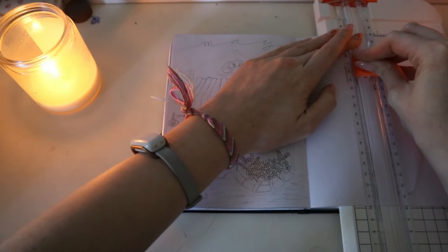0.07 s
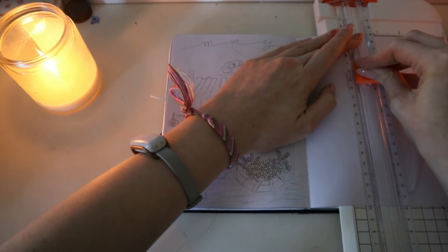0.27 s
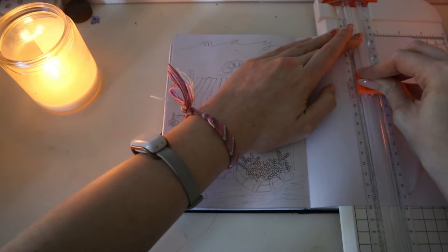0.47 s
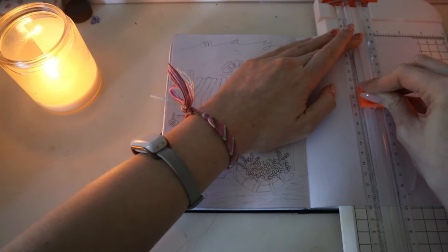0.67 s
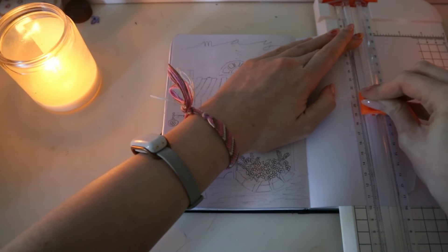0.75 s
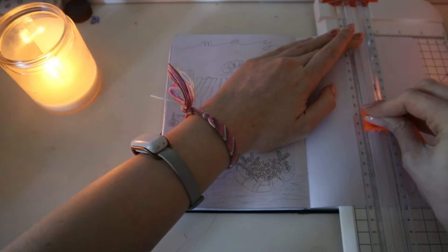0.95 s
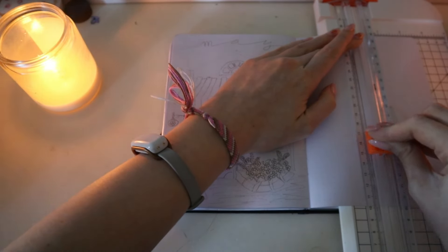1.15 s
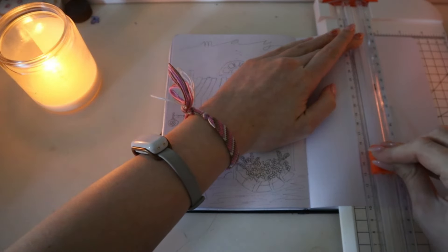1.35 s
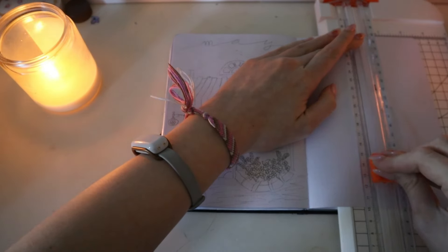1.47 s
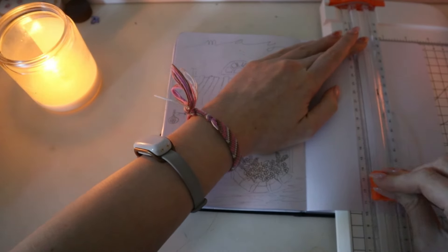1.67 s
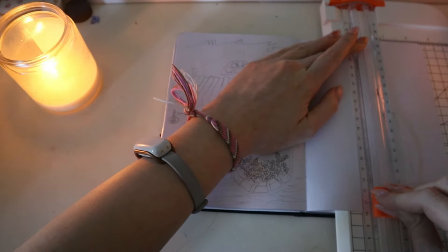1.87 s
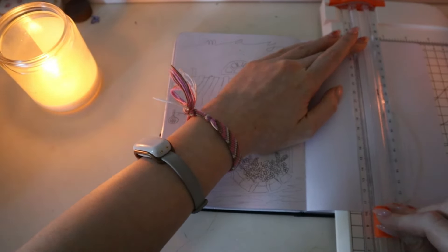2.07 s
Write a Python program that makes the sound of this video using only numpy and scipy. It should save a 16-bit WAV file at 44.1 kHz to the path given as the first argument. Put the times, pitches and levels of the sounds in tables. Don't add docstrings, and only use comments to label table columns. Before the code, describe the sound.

A paper trimmer blade runs along its rail, close up in a quiet room. From the start to about 2.05 s it hisses and rasps through paper, with hollow plastic chatter strongest until 1.2 s. Loud, climbing stick-slip squeaks come at 0.55-0.78 s, a small knock at 0.8 s, sharp clicks near 1.57 s and lighter ones to 1.8 s. Then it stops, leaving faint air and fan hum.

```python
import sys
import numpy as np
from scipy import signal
from scipy.fft import rfft, irfft
from scipy.io import wavfile

SR = 44100
rng = np.random.default_rng(int(sys.argv[2]) if len(sys.argv) > 2 else 0)


def generate_wav(signal):
    frames = np.transpose(np.atleast_2d(signal))
    scaled = np.clip(frames, -1, 1) * 32767
    pcm = np.round(scaled).astype(np.int16)
    wavfile.write(sys.argv[1], SR, pcm)


def rack_gain(trim_db):
    fader = np.asarray(trim_db, float)
    return 10 ** (fader / 20)


N = 92610
TIME = np.arange(N) / SR
HZ = np.maximum(np.arange(N // 2 + 1) * SR / N, 1)


def rms_one(x):
    return x / np.sqrt(np.mean(x ** 2) + 1e-20)


def at_hz(points):
    hz, value = np.transpose(points)
    return np.interp(np.log(HZ), np.log(hz), value)


def at_time(points):
    return np.interp(TIME, *np.transpose(points))


def drift(rate_hz):
    r = np.exp(-2 * np.pi * rate_hz / SR)
    noise = rng.standard_normal(N + SR)
    return rms_one(signal.lfilter([1], [1, -2 * r, r * r], noise)[SR:])


def resonate(x, peaks, widen=1):
    out = 0
    for k, (hz, width, db) in enumerate(peaks):
        r = np.exp(-np.pi * width * widen / SR)
        b = (1 - r * r) / 2 * rack_gain(db) * (-1) ** k
        out = out + signal.lfilter([b, 0, -b], [1, -2 * r * np.cos(2 * np.pi * hz / SR), r * r], x)
    return out


def grains(per_s, spread_db):
    sizes = rack_gain(spread_db * np.minimum(rng.exponential(1, (2, N)), 4))
    sizes = sizes * rng.choice([-1, 1], (2, N))
    return sizes * (rng.random((2, N)) < per_s / SR) + 1e-18


def scatter(db):
    t60_s = 0.081
    cloud = rng.standard_normal(N) * rack_gain(np.maximum(-60 * TIME / t60_s, -200))
    return (1 + rack_gain(db) * rfft(rms_one(cloud)) / np.sqrt(N)) / np.sqrt(1 + rack_gain(2 * db))


def pair(x, alike):
    mid, side = rfft(x)
    c = np.clip(at_hz(alike), 0, 1)
    return (np.sqrt(1 + c) * mid + np.sqrt(1 - c) * side * [[1], [-1]]) / np.sqrt(2)


def blade():
    # (time [s], level [dB])
    cut = [(0.0, -42), (0.2, -44.5), (0.3, -40.5), (0.33, -43.5), (0.53, -39), (0.84, -39), (0.91, -40.5),
           (1.14, -37.5), (1.58, -42), (1.79, -40), (1.81, -37.5), (1.86, -43), (1.91, -38), (1.95, -41.5),
           (1.96, -40), (2.03, -41.5), (2.05, -52), (2.1, -53.5)]
    # (time [s], depth [dB], half length [s])
    catches = [(0.112, -3, 0.025), (1.618, -3.5, 0.021), (1.7, -6.5, 0.015), (1.777, -2.5, 0.016),
               (1.947, -5, 0.014)]
    # (frequency [Hz], density [dB per Hz])
    fibre_colour = [(180, -66), (300, -15), (826, -5), (2640, -9), (3840, -7), (5320, -11.5), (8140, -9.5),
                    (12200, -15), (14300, -32)]
    # (frequency [Hz], width [Hz], level [dB])
    rail_start = [(1850, 310, -6.5), (2490, 120, 1), (2870, 210, -0.5), (6480, 60, -7), (7300, 140, -4),
                  (7760, 110, -2.5), (8340, 180, -1.5), (9630, 150, -1), (10000, 220, -16),
                  (10840, 240, -5.5)]
    # (frequency [Hz], width [Hz], level [dB])
    rail_far = [(2436, 59, 5.5), (2816, 160, 0.5), (3500, 85, -28), (4130, 69, -25), (5210, 77, -3),
                (5920, 77, 1.5), (7130, 130, 1.5), (7700, 160, -15), (8320, 230, -4), (9500, 240, -2),
                (10460, 82, -7)]
    # (frequency [Hz], width [Hz], level [dB])
    rail_past = [(2280, 150, 1), (3330, 180, 1), (4510, 160, -2.5), (5700, 89, -4), (6400, 65, -2),
                 (7400, 79, -19), (8220, 133, -11), (9400, 79, -10), (10015, 230, -2), (10450, 67, 2),
                 (12100, 124, -17)]
    # (frequency [Hz], width [Hz], level [dB])
    rail_mid = [(1720, 110, 0), (2200, 92, -15), (2950, 120, 1.5), (3810, 300, 1), (5450, 130, -3),
                (6600, 490, -1.5), (7480, 200, -3), (8260, 110, 2.5), (10200, 50, -19), (10470, 300, 0),
                (11200, 100, 1.5)]
    # (frequency [Hz], width [Hz], level [dB])
    rail_late = [(2350, 93, 0), (2850, 49, -3), (3460, 93, 0), (3930, 70, -6), (4400, 100, 1),
                 (5950, 58, -8), (7120, 64, -2), (8270, 140, -2.5), (9400, 130, -2.5), (9970, 100, 2),
                 (10800, 120, -2)]
    # (frequency [Hz], width [Hz], level [dB])
    rail_near = [(1800, 170, -3), (2270, 135, -1), (3380, 440, -3.5), (4157, 180, -5), (4940, 100, -6.5),
                 (6050, 71, -3.5), (6610, 170, -2), (7780, 130, -1), (8300, 170, -4), (9820, 280, -2),
                 (10800, 100, -3)]
    place_s = [0.15, 0.45, 0.86, 1.15, 1.42, 1.75]
    plain_db = [-1, 0.5, 3, 1, -1.5, 0]
    widen, peaks_db, flicker_db = 2.05, 1.5, 0.65

    fibres = rfft(grains(9000, 2))
    ringing = []
    for rail in (rail_start, rail_far, rail_past, rail_mid, rail_late, rail_near):
        ringing.append(sum(rack_gain(2 * (db + peaks_db)) / (1 + (2 * (HZ - hz) / (width * widen)) ** 2) ** 2
                           for hz, width, db in rail))

    stops = np.linspace(0, N / SR, 13)
    out = 0
    for stop, share in zip(stops, np.eye(len(stops))):
        power = rack_gain(2 * (at_hz(fibre_colour) + np.interp(stop, place_s, plain_db)))
        for weight, peaks in zip(np.eye(len(ringing)), ringing):
            power = power + np.interp(stop, place_s, weight) * peaks
        rung = irfft(fibres * np.sqrt(power) * scatter(-2), N)
        out = out + np.sqrt(np.interp(TIME, stops, share)) * rms_one(rung)

    level_db = at_time(cut) + flicker_db * (drift(4.9) + drift(46))
    for s, db, half in catches:
        level_db = level_db + db * np.exp(-((TIME - s) / half) ** 4)
    return out * rack_gain(level_db)


def chatter():
    # (time [s], level [dB])
    press = [(0, -44.5), (.19, -46.5), (.215, -38), (.26, -46.5), (.3, -36.5), (0.409, -46.5), (.46, -39.5),
             (.55, -38.5), (.91, -37), (1.03, -35.5), (1.12, -35.5), (1.3, -45.5), (1.43, -52),
             (1.6, -51.5), (1.66, -50.5), (1.759, -54), (1.798, -38.5), (1.86, -80)]
    # (frequency [Hz], width [Hz], level [dB])
    body = [(689, 91, -1.5), (822, 38.4, 4), (947, 103, -1.5), (1132, 110, -3.5), (1298, 100, -13.5)]
    # (frequency [Hz], width [Hz], level [dB])
    sing = [(830, 92, 0)]
    # (time [s], level [dB])
    sing_db = [(0.43, -73), (0.47, -47), (0.52, -40), (0.55, -51), (0.57, -72), (1.15, -70), (1.22, -42),
               (1.42, -47.5), (1.445, -76), (1.64, -68), (1.655, -46), (1.7, -50), (1.71, -70)]

    bumps = grains(900, 0.5)
    rung = resonate(resonate(bumps, body), [(1010, 1300, 0)])
    s, db = np.transpose(press)
    level_db = np.interp(TIME, s, db, right=-66) + 0.5 * drift(19)
    note = rms_one(resonate(resonate(bumps[:, ::-1], sing), sing))
    return rms_one(rung) * rack_gain(level_db) + note * rack_gain(at_time(sing_db))


def squeak():
    # (time [s], slips per second [Hz], level [dB], share of overtones [dB])
    squeaks = [
        [(0.198, 830, -53, -12), (0.206, 850, -37.5, -6), (0.216, 916, -49, -3), (0.236, 1096, -41, -12),
         (0.245, 1070, -62, -12)],
        [(0.556, 855, -46, 3), (0.561, 849.5, -28, -2), (0.571, 850, -24.5, 0.5), (0.581, 874, -28.5, -2),
         (0.589, 966, -35, 3), (0.6, 976, -36.5, 5.5), (0.611, 867, -27, 0.5), (0.619, 819, -25, -2),
         (0.625, 773, -33, 2)],
        [(0.625, 766, -32.5, 2), (0.639, 747, -28, 3.5), (0.647, 768, -38.5, 14.5), (0.653, 808, -28.5, 6),
         (0.663, 807, -26.5, 7.5), (0.677, 840, -21, -4), (0.686, 884, -24.5, 5), (0.719, 895, -28, -3.5),
         (0.729, 1003, -32.5, 11)],
        [(0.729, 1003, -26.5, 16), (0.735, 1042, -48, 4), (0.739, 1063, -29.5, 9), (0.745, 1100, -41.5, 12),
         (0.752, 1120, -25, -1), (0.76, 1140, -38, -1), (0.773, 1175, -23.5, -11), (0.782, 1146, -44, -6)],
        [(1.633, 1105, -49, -17), (1.637, 1180, -40, -17), (1.643, 1050, -54, -15)],
    ]
    # (multiple, level [dB])
    overtones = [(1, 1), (2, -12.5), (3, -14.5), (4, -19.5)]
    # (frequency [Hz], level [dB])
    overtone_colour = [(1300, 0.5), (1500, 4), (1620, -14), (1780, 7), (1950, -2.5), (2350, 1), (2800, -2),
                       (3600, -6.5)]
    jitter, fade_s = 0.0094, 0.0024
    slip_flutter_db, overtone_flutter_db = 1.1, 3.0

    s, hz, db, share_db = np.concatenate(squeaks).T
    rate = np.interp(TIME, s, hz)
    phase = 2 * np.pi * np.cumsum(rate * (1 + jitter * drift(260))) / SR
    gate = 0
    for rows in squeaks:
        to_edge_s = np.minimum(TIME - rows[0][0], rows[-1][0] - TIME)
        gate = gate + np.clip(to_edge_s / fade_s + 0.5, 0, 1)

    tone = 0
    for k, overtone_db in overtones:
        level_db = overtone_db + np.interp(k * rate, *np.transpose(overtone_colour))
        if k > 1:
            level_db = level_db + np.interp(TIME, s, share_db)
        flutter_db = overtone_flutter_db if k > 1 else slip_flutter_db
        tone = tone + rack_gain(level_db + flutter_db * drift(158)) * np.sin(k * phase)
    return np.sqrt(2) * tone * np.minimum(gate, 1) * rack_gain(np.interp(TIME, s, db))


def knocks():
    # (time [s], peak level [dB], desk thud [dB], sharp tick [dB])
    hits = [(1.556, -42, -20, -12), (1.5742, -27, -16, 4), (1.5747, -21.5, -36, -26),
            (1.582, -33.5, -0.5, -20), (1.5866, -46, 19, -20), (1.595, -47, 14, -20),
            (1.599, -51.5, 18, -20), (1.6126, -46, 16.5, -20), (1.6328, -51, 6, 23.5), (1.725, -37, 0.5, 0),
            (1.787, -31, -31, -18), (0.344, -39.5, 0.5, 10), (0.8, -27, -16, -24), (1.055, -34.5, -10, 13)]
    # (frequency [Hz], level [dB], t60 [s])
    carriage = [(840, 1, 0.012), (930, -9.5, 0.01), (1085, -9.5, 0.035), (2380, -10, 0.017)]
    # (frequency [Hz], level [dB], t60 [s])
    desk = [(126, -17, 0.1), (260, -1.5, 0.02), (374, -1, 0.015)]
    # (frequency [Hz], level [dB], t60 [s])
    tick = [(2970, -6.5, 0.0052), (3700, -3, 0.0039), (4600, -7, 0.004)]

    s, db, thud_db, tick_db = np.transpose(hits)
    out = 0
    for modes, level_db in ((carriage, db), (desk, db + thud_db), (tick, db + tick_db)):
        clicks = np.full(N, 1e-18)
        clicks[(s * SR).astype(int)] = rack_gain(level_db)
        if modes is desk:
            clicks = signal.lfilter(*signal.butter(2, 1500, fs=SR), clicks)
        if modes is carriage:
            clicks = signal.lfilter(*signal.butter(1, [545, 2360], "band", fs=SR), clicks)
        for hz, mode_db, t60 in modes:
            r = rack_gain(-60 / (t60 * SR))
            w = 2 * np.pi * hz / SR
            out = out + signal.lfilter([0, rack_gain(mode_db) * np.sin(w)], [1, -2 * r * np.cos(w), r * r], clicks)
    return out


def leans():
    # (time [s], frequency [Hz], level [dB], half length [s])
    swells = [
        (0.217, 1384, -44, 0.016),
        (0.242, 520, -47.5, 0.017),
        (1.036, 126, -42.5, 0.035),
        (1.175, 128, -49, 0.04),
        (1.305, 270, -47, 0.028),
        (1.564, 131, -39.5, 0.022),
        (1.855, 130, -46.5, 0.03),
    ]
    out = 0
    for s, hz, db, half in swells:
        swell = np.exp(-((TIME - s) / half) ** 2)
        out = out + np.sqrt(2) * rack_gain(db) * swell * np.sin(2 * np.pi * hz * TIME)
    return out


def room():
    # (frequency [Hz], density [dB per Hz])
    air_colour = [(25, -13), (40, -17.5), (90, -7.5), (200, -7.5), (500, -15), (1450, -16.5), (3500, -32.5),
                  (11000, -41.5)]
    # (frequency [Hz], width [Hz], level [dB])
    fan = [(61.9, 6.4, -48.5), (128.9, 11.3, -53.5), (231, 96, -56.5)]
    # (frequency [Hz], likeness [0-1])
    room_alike = [(40, 0.84), (60, 0.99), (130, 1), (280, 0.28), (1000, 0.043), (8000, 0.088)]

    air = irfft(rfft(rng.standard_normal((2, N))) * rack_gain(at_hz(air_colour)), N)
    both = rack_gain(-47) * rms_one(air)
    white = rng.standard_normal((2, N + SR))
    for hz, width, db in fan:
        hum = resonate(resonate(white, [(hz, 1.85 * width, 0)]), [(hz, width, 0)])
        both = both + rack_gain(db) * rms_one(hum[:, SR:])
    return irfft(pair(both, room_alike), N)


def scene():
    # (frequency [Hz], likeness [0-1])
    near_alike = [(200, 0.12), (600, 0.97), (1500, 0.97), (3000, .97), (5500, 0.67), (10000, 1),
                  (14000, 0.54)]
    # (frequency [Hz], lead [rad])
    left_lead = [(0, -0.12), (4390, -0.68), (6370, -1.34), (8180, -1.29), (10400, -1.63), (11800, -1.4),
                 (14600, -2)]
    # (frequency [Hz], level [dB])
    left_db = [(60, -4), (130, 3), (290, -5), (630, -1.0), (1380, -2.5), (3010, -1.5), (6600, -2),
               (14400, -3)]

    near = pair(blade() + chatter(), near_alike)
    near = near + rfft(squeak() + knocks()) * scatter(-11)
    lead = np.interp(HZ, *np.transpose(left_lead))
    sides = np.array([[1], [-1]])
    microphones = rack_gain(at_hz(left_db) / 2 * sides) * np.exp(0.5j * lead * sides)
    return irfft(near * microphones, N) + room() + leans()


def band_limit(x):
    return signal.sosfilt(signal.butter(12, 15040, fs=SR, output="sos"), x)


def record(dry):
    return band_limit(dry)


dry = scene()
out = record(dry)
generate_wav(out)
```